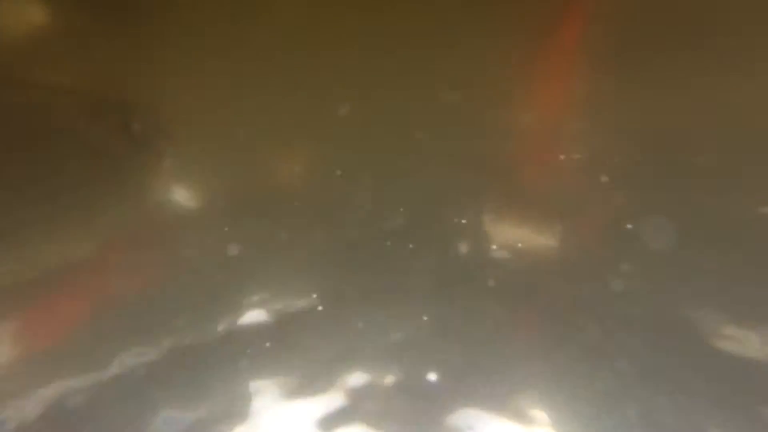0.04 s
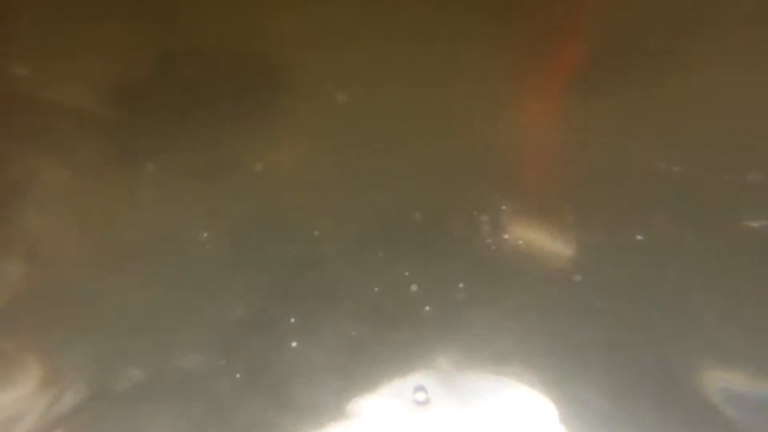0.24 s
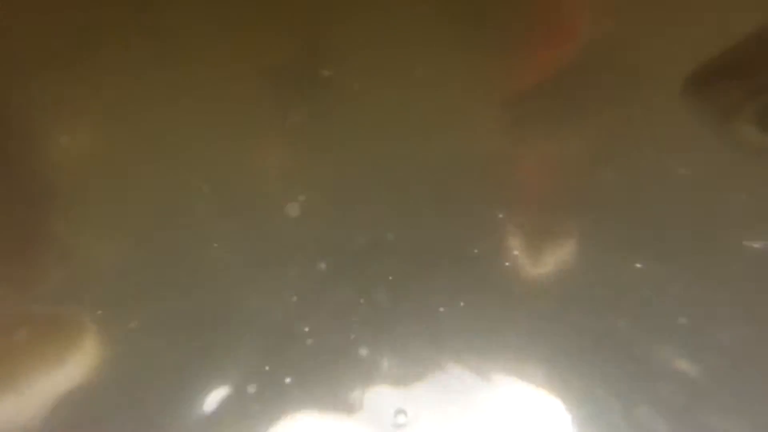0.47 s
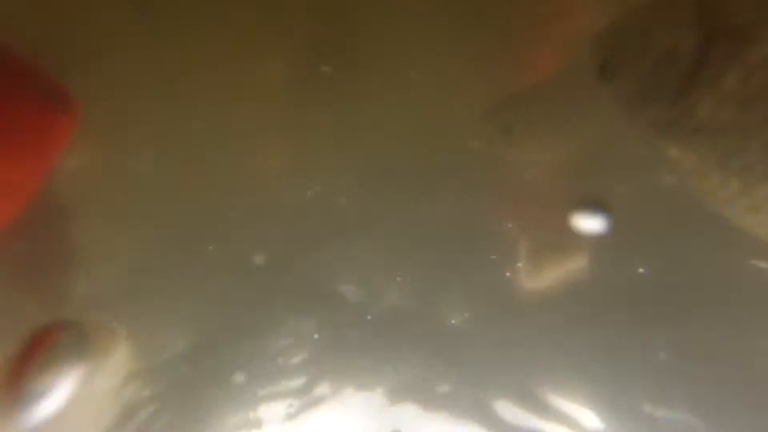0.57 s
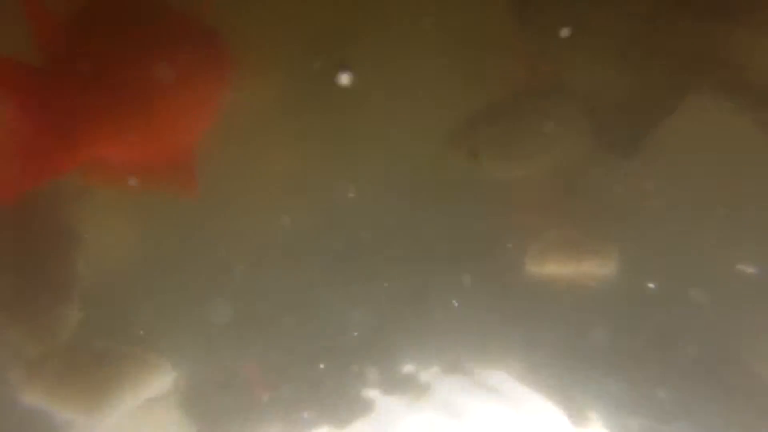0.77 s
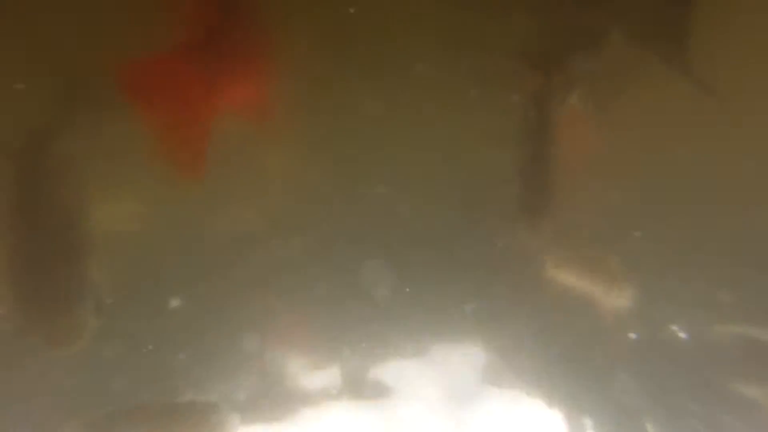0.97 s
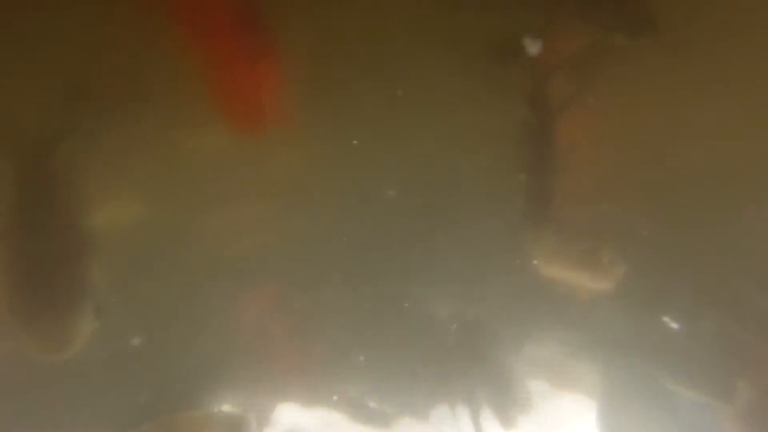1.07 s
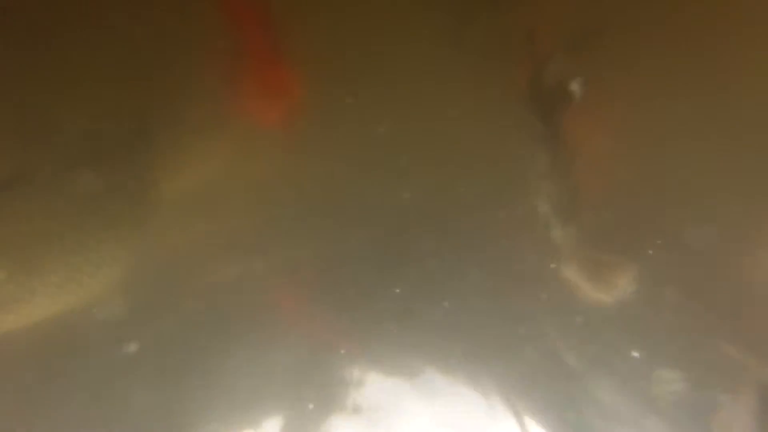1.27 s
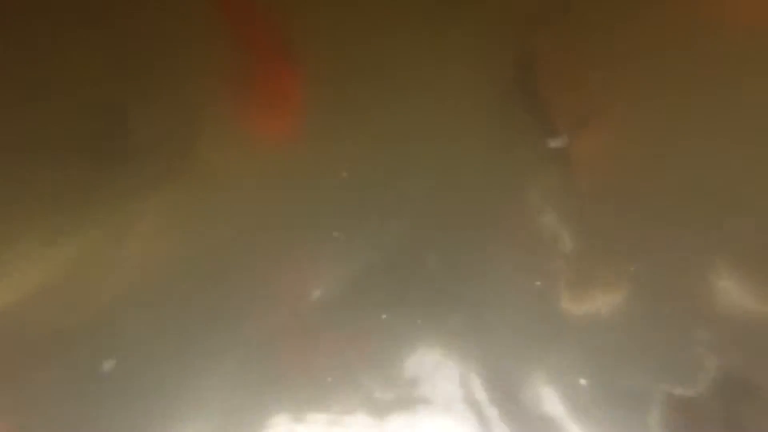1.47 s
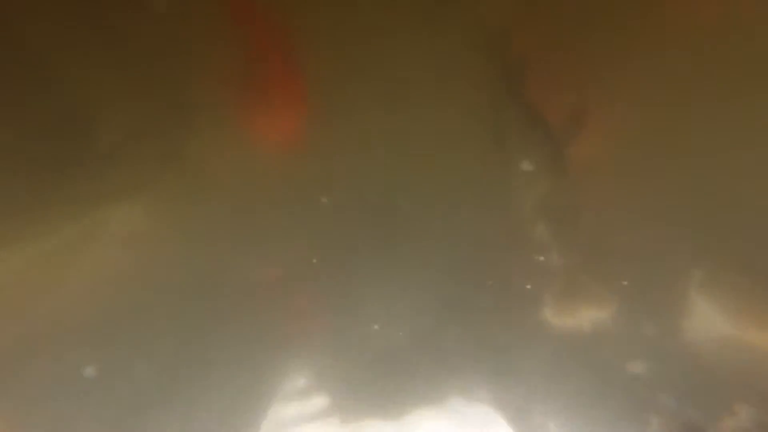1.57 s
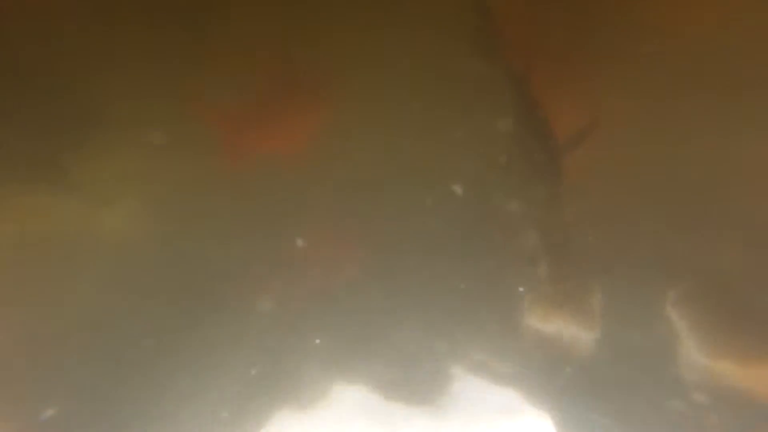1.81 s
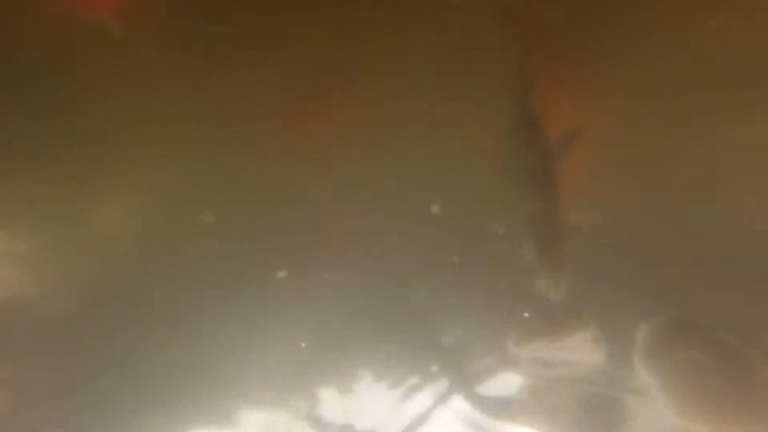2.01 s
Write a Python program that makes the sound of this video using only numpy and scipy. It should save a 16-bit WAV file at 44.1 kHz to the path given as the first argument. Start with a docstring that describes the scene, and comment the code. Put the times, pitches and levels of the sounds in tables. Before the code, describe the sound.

Close underwater bumps from fish feeding around a microphone in a pond. A mouth rasps quickly across the casing, light clicks and gurgles follow, and a heavy dull knock leaves a fading low hum over faint hiss.

```python
"""Fish knock and rasp on the housing of a camera held under the surface of a pond.
Each contact excites the housing's damped modes, and each shove sets the mount swinging with a low hum.
Fins and mouths push the water in soft pressure pulses, and feeding makes sharp clicks. Bubbles resonate
singly and in gurgling clouds, over distant bubbling, a sparse fizz and a faint hiss."""
import sys
import numpy as np
from scipy import signal
from scipy.fft import rfft, irfft
from scipy.io import wavfile

SR = 44100
rng = np.random.default_rng(int(sys.argv[2]) if len(sys.argv) > 2 else 0)


def store_wav(level_fs):
    """Save 16-bit WAV to argv[1]."""
    pcm = np.round(np.clip(np.atleast_2d(level_fs), -1, 1) * 32767)
    wavfile.write(sys.argv[1], SR, pcm.T.astype(np.int16))


N = 90404

# Noise spectra. Each row: frequency in Hz, level in dB.
HISS_SPECTRUM = [(20, 24.5), (80, 27.5), (160, 20), (600, -7), (1200, 4), (3000, -1), (4500, -7.5),
                 (6800, -2), (9000, -12.5), (11000, -2.5), (14300, -0.5), (15400, -16), (16500, -28.5)]  # steady background
CHURN_SPECTRUM = [(100, -17.5), (200, 16.5), (400, 16.5), (800, -12.5), (1300, -6.5), (2000, 3.5),
                  (3000, -32.5), (8000, -29)]  # stirred water around a gurgle
CLICK_SPECTRUM = [(300, 18.5), (2000, 8.5), (3300, 4.5), (4300, -4.5), (7500, 3.5), (11000, -14),
                  (16000, -25)]  # sharp click
GRIT_SPECTRUM = [(300, -14), (1200, -11), (2300, 2.5), (2900, -5.5), (4000, -2), (5000, 3), (6500, -0.5),
                 (7800, -7.5), (9200, -17), (10800, 4.5), (12200, -13), (14000, 3.5), (15000, -19),
                 (16000, -29.5)]  # one slip of a mouth
DRAG_SPECTRUM = [(500, -7.5), (1100, -6), (1700, -3.5), (2300, 5), (3000, 4), (5000, -7.5), (7500, -3),
                 (9300, -10), (10800, -3.5), (12300, -9.5), (14000, -3.5), (16000, -18)]  # unbroken crunch under the slips
CRACK_SPECTRUM = [(300, -5.5), (1000, -6), (2000, 13.5), (3400, 4), (5500, -0.5), (8000, -24),
                  (11000, -22.5), (16000, -34.5)]  # onset of a knock
# Single bubbles. Each row: start in seconds, level in dB, pitch in Hz, t60 in seconds.
SINGLE_BUBBLES = [(.271, -33, 308.3, 0.14), (.346, -43.5, 650, 0.044), (.3612, -41.5, 1830, 0.026),
                  (.388, -37, 668, 0.045), (.3935, -47.5, 2084, 0.014), (.412, -30.5, 667, 0.029),
                  (.421, -41.5, 897, .035), (.4402, -38, 1400, 0.021), (.4415, -35.5, 967, 0.033),
                  (.498, -40.5, 689, 0.086), (.5142, -31, 2240, 0.018), (.5142, -51, 3580, 0.01),
                  (.5642, -26.5, 3350, 0.0072), (.6128, -40, 1290, 0.0085), (.6148, -34.5, 1714, 0.026),
                  (.6195, -62, 3550, 0.017), (0.6487, -45.5, 1810, 0.017), (.650, -56, 667, 0.03),
                  (.797, -47, 660, 0.065), (.9388, -45.5, 2075, 0.03), (.957, -52.5, 4920, 0.013),
                  (.9945, -45, 697, 0.027), (1.037, -39, 609, 0.071), (1.0675, -54.5, 2515, 0.022),
                  (1.1272, -27.5, 624, 0.012), (1.2035, -52, 780, 0.027), (1.2702, -58, 6950, 0.013),
                  (1.3445, -47.5, 642, 0.029), (1.4518, -60, 5300, 0.0071), (1.464, -60, 5580, 0.0081),
                  (1.528, -63.5, 2237, 0.046), (1.601, -58, 6690, .01), (1.755, -54, 1176, 0.039),
                  (1.9815, -57, 1746, 0.022), (2.005, -50.5, 400, 0.057)]
# Bubble clouds. Each row: start in seconds, length in seconds, level in dB, middle pitch in Hz.
GURGLE_CLOUDS = [(.29, 0.039, -47, 523), (0.302, 0.039, -62.5, 1890), (0.393, 0.038, -51, 806),
                 (0.472, 0.029, -49.5, 722), (0.551, 0.063, -49, 761), (0.61, 0.039, -66.5, 770),
                 (.57, .09, -77, 2470), (0.913, .05, -64, 657), (0.986, 0.06, -55.5, 711),
                 (1.042, 0.039, -61, 798), (1.121, 0.016, -58, 897), (1.2, 0.058, -54, 755),
                 (1.346, 0.02, -77.5, 632), (1.386, 0.036, -57.5, 763), (1.559, 0.055, -61.5, 525),
                 (1.966, .05, -68.5, 594)]
# Pushes of water. Each row: time of the peak in seconds, level in dB, centre frequency in Hz.
WATER_PUSHES = [(0.0774, -35, 345), (.101, -40, 177), (0.108, -36, 103), (.279, -39, 78),
                (0.303, -32.5, 88), (.3287, -29, 400), (0.483, -35.5, 444), (.488, -36.5, 121.5),
                (0.565, -42.5, 172.6), (0.918, -39, 173), (1.129, -36.5, 252.7), (1.310, -36.5, 159.7),
                (1.436, -25.5, 94), (1.7145, -30, 102.8), (1.755, -32, 283), (1.760, -23.5, 123.3),
                (1.77, -23.5, 57.3)]
# Sharp clicks: snaps of feeding fish, and at 0.5644 s the sharp crack of the knock at 0.5621 s. Each row: start
# in seconds, level in dB.
SHARP_CLICKS = [(.127, -47.5), (.313, -73), (0.331, -51.5), (0.3605, -41.5), (0.5135, -56), (0.5644, -31),
                (0.582, -50), (0.612, -52), (0.652, -56), (0.854, -65.5), (0.883, -56), (.939, -59),
                (1.12, -55), (1.9799, -62)]
# Modes of the mount and of the housing. Each row: frequency in Hz, level in dB, t60 in seconds.
MOUNT_MODES = [(39.98, 4.5, 1.064), (92, -5.5, 0.81), (198, -31, .2), (283, -23.5, .35)]
HOUSING_MODES = [(297.7, -13.5, 0.14), (487, -4, 0.079), (569, -0.5, .06), (654.4, 2, .052),
                 (867, -11, .035), (915, -12, 0.047), (1066.5, -10, 0.022), (1503, -7, .04),
                 (1730, -10.5, .035), (2240, -9, 0.022), (2350, -10.5, 0.029), (5090, -22.5, .03)]
# Shoves on the mount. Each row: start in seconds, level in dB, extra level of the upper modes in dB.
MOUNT_SHOVES = [(.001, -58.5, -1), (0.086, -43.5, 0.5), (.255, -34.5, -1.5), (.572, -40.5, -18),
                (1.126, -64, 8.5), (1.367, -54, 3.5), (1.429, -22.5, -5), (1.762, -43, 3)]
# Slips of a mouth over the housing. Each row: start in seconds, ring level in dB, grit level in dB.
MOUTH_SLIPS = [(0.2137, -18.5, -24), (.2150, -24, -24), (.2215, -23, -28), (.2246, -18.5, -33),
               (.2277, -31.5, -31), (0.232, -26, -22.5), (0.2327, -42.5, -25), (0.2394, -41, -28),
               (0.244, -41.5, -23.5), (.2545, -48, -41.5), (.2665, -53.5, -52.5)]
# Knocks. Each row: start in seconds, ring level in dB, brightness in Hz, crack level in dB.
HOUSING_KNOCKS = [(0.0769, -45.5, 1010, -50.5), (0.2053, -36.5, 700, -40), (0.2673, -30.5, 450, -49),
                  (0.2903, -43.5, 800, -56.5), (0.552, -39.5, 1600, -50), (0.5621, -36.5, 1960, -34.5),
                  (0.5759, -42, 1820, -48), (.916, -53.5, 900, -78.5), (1.1268, -45, 1430, -69),
                  (1.308, -54, 700, -72.5), (1.428, -12.5, 771, -42.5), (1.593, -56.5, 802, -75.5)]

FIZZ_PER_S, FIZZ_HZ, FIZZ_SPREAD_OCT = 28, 5180, 0.5
FIZZ_DB, FIZZ_SIZE_DB, FIZZ_SKIRT_DB = -83.5, 5.5, -15
BUBBLE_GLIDE = 0.07  # share of pitch gained over one t60
CLOUD_SPREAD_OCT, CLOUD_SIZE_DB, CLOUD_T60_CYCLES = 0.38, 5, 25
SLIP_BRIGHT_HZ, GRIT_HOLD_S, GRIT_TAIL_DB = 5100, 0.00081, -25.5
DRAG_START_S, DRAG_LENGTH_S, DRAG_GRAINS_PER_S = 0.214, 0.025, 4000
DRAG_DB, DRAG_RING_DB, DRAG_HIGHPASS_HZ = -33, -28, 1150


def amp(db):
    """Amplitude ratio of a level in decibels."""
    return 10 ** (np.asarray(db) / 20)


def unit(x):
    """Normalisation to rms 1."""
    return x / np.sqrt(np.mean(x ** 2) + 1e-20)


def add(mix, start, sound):
    """Superposition: a sound joins the mix at a start in seconds."""
    part = mix[max(round(start * SR), 0):][:len(sound)]
    part += sound[:len(part)]


def noise(spectrum, size):
    """Spectral shaping of white noise, scaled to rms 1."""
    hz, db = np.transpose(spectrum)
    gain = amp(np.interp(np.log(np.fft.rfftfreq(size, 1 / SR) + 1), np.log(hz), db))
    return unit(irfft(rfft(rng.standard_normal(size)) * gain, size))


def fade(t, t60):
    """Exponential decay, 60 dB down at t60."""
    return np.exp(-np.log(1000) * t / t60)


def snap(spectrum, t60, rise_s=0.00091):
    """A noise transient with a quick attack and an exponential decay."""
    t = np.arange(SR // 10) / SR
    return noise(spectrum, len(t)) * fade(t, t60) * (1 - np.exp(-t / rise_s))


def hiss(db=-70):
    """Stationary noise: a faint hiss, strongest in the bass."""
    return amp(db) * noise(HISS_SPECTRUM, N)


def fizz():
    """Tiny bursting bubbles radiate sparse transients, each in its own treble band."""
    out, count = np.zeros(N), int(FIZZ_PER_S * N / SR)
    for k, (pitch, size, late) in enumerate(rng.standard_normal((count, 3))):
        hz = FIZZ_HZ * 2 ** (FIZZ_SPREAD_OCT * pitch)
        band = [(hz / 2, FIZZ_SKIRT_DB), (hz, 0),
                (hz * np.sqrt(2), FIZZ_SKIRT_DB), (hz * 2, 2 * FIZZ_SKIRT_DB)]
        start = (k + late % 1) * N / SR / count
        add(out, start, amp(FIZZ_SIZE_DB * min(size, 1)) * snap(band, t60=0.012))
    return amp(FIZZ_DB) * unit(out)


def bubble(hz, t60):
    """A bubble is a damped oscillator whose pitch rises a little as it rings."""
    t = np.arange(0, 1.5 * t60, 1 / SR)
    cycles = hz * (t + BUBBLE_GLIDE * t ** 2 / (2 * t60))
    onset = 1 - np.exp(-cycles ** 2)
    return onset * fade(t, t60) * np.sin(2 * np.pi * cycles)


def cloud(length, middle_hz, per_s):
    """Bubbles of random size and timing add incoherently, to rms 1 over the length."""
    count = max(int(length * per_s), 1)
    out = np.zeros(int(length * SR) + SR // 10)
    for k, (pitch, size, late) in enumerate(rng.standard_normal((count, 3))):
        hz = middle_hz * 2 ** (CLOUD_SPREAD_OCT * pitch)
        gain = amp(CLOUD_SIZE_DB * (size - abs(pitch)))
        add(out, (k + late % 1) * length / count, gain * bubble(hz, CLOUD_T60_CYCLES / hz))
    return out * np.sqrt(length * SR / np.sum(out ** 2))


def bubbling(distant_db=-72, churn_db=-15.5):
    """Bubble resonance: a distant cloud, near single bubbles, and gurgles in the noise of stirred water."""
    out = amp(distant_db) * cloud(N / SR, middle_hz=546, per_s=370)[:N]
    for start, db, hz, t60 in SINGLE_BUBBLES:
        add(out, start, amp(db) * bubble(hz, t60))
    for start, length, db, hz in GURGLE_CLOUDS:
        add(out, start, amp(db) * cloud(length, hz, per_s=540))
        swell = signal.get_window(("tukey", 0.5), int(length * SR))
        churn = swell * noise(CHURN_SPECTRUM, SR // 4)[:len(swell)]
        add(out, start, amp(db + churn_db) * churn)
    return out


def pushes():
    """Water displaced by a fin or mouth makes one pressure peak with a dip on either side."""
    out = np.zeros(N)
    for peak_s, db, hz in WATER_PUSHES:
        offset = np.pi * hz * (np.arange(N) / SR - peak_s)
        out += amp(db) * (1 - 3 * offset ** 2) / (1 + offset ** 2) ** 3
    return out


def clicks():
    """Brief broadband transients, heard as dry snaps: feeding fish, and the sharp crack of one knock on the
    housing."""
    out = np.zeros(N)
    for start, db in SHARP_CLICKS:
        add(out, start, amp(db) * snap(CLICK_SPECTRUM, t60=0.011))
    return out


def mount(rise_s=0.021):
    """Free vibration of the mount: each shove catches the swing and starts it anew."""
    out = np.zeros(N)
    for start, db, upper_db in MOUNT_SHOVES:
        t = np.maximum(np.arange(N) / SR - start, 0)
        swing = sum(amp(db + mode_db + upper_db * (k > 0)) * fade(t, t60) * np.cos(2 * np.pi * hz * t)
                    for k, (hz, mode_db, t60) in enumerate(MOUNT_MODES))
        grip = np.sin(np.pi / 2 * np.minimum(t / rise_s, 1)) ** 2
        out = (1 - grip) * out + grip * swing
    return out


def housing(bright_hz, contact_cycles=0.25):
    """Modal response to one contact: a softer one builds more slowly and misses the high modes."""
    t = np.arange(SR // 3) / SR
    ring = np.zeros(len(t))
    for k, (hz, db, t60) in enumerate(HOUSING_MODES):
        gain = amp(db) / np.sqrt(1 + (hz / bright_hz) ** 8)
        ring += (-1) ** k * gain * fade(t, t60) * np.sin(2 * np.pi * hz * t)
    onset = 1 - np.exp(-(t * bright_hz / contact_cycles) ** 2)
    return ring * onset


def rasp():
    """Stick-slip friction: each slip of a mouth rings the housing with a gritty puff, over a crunch."""
    out, t = np.zeros(N), np.arange(SR // 10) / SR
    puff = fade(np.maximum(t - GRIT_HOLD_S, 0), t60=0.0037) + amp(GRIT_TAIL_DB) * fade(t, t60=0.065)
    for start, ring_db, grit_db in MOUTH_SLIPS:
        add(out, start, amp(ring_db) * housing(SLIP_BRIGHT_HZ))
        add(out, start, amp(grit_db) * puff * noise(GRIT_SPECTRUM, len(t)))
    # The crunch: dense random impulses excite a noise burst and the housing's upper modes.
    strengths = rng.standard_normal(len(t))
    grains = strengths * (rng.random(len(t)) < DRAG_GRAINS_PER_S / SR) * (t < DRAG_LENGTH_S)
    highpass = signal.butter(4, DRAG_HIGHPASS_HZ, "high", fs=SR, output="sos")
    upper_ring = signal.sosfilt(highpass, housing(SLIP_BRIGHT_HZ))
    for db, response in (DRAG_DB, snap(DRAG_SPECTRUM, t60=0.015)), (DRAG_RING_DB, upper_ring):
        crunch = signal.fftconvolve(grains, response)
        add(out, DRAG_START_S, amp(db) * crunch * np.sqrt(DRAG_LENGTH_S * SR / np.sum(crunch ** 2)))
    return out


def knocks():
    """Impact excitation: a fish bumps the housing, which cracks and rings in its modes."""
    out = np.zeros(N)
    for start, ring_db, bright_hz, crack_db in HOUSING_KNOCKS:
        add(out, start, amp(ring_db) * housing(bright_hz))
        add(out, start, amp(crack_db) * snap(CRACK_SPECTRUM, t60=0.024))
    return out


def scene():
    """The pressures of all sources superpose at one microphone."""
    return (hiss() + knocks() + rasp() + clicks() + mount() + pushes() + fizz() + bubbling())[None]


def record(dry, cutoff_hz=16100):
    """Band limiting: a steep low-pass filter removes the highest treble."""
    lowpass = signal.firwin(511, cutoff_hz, window=("kaiser", 9), fs=SR)
    return signal.oaconvolve(dry, lowpass[None], "same")


dry = scene()
out = record(dry)
store_wav(out)
```